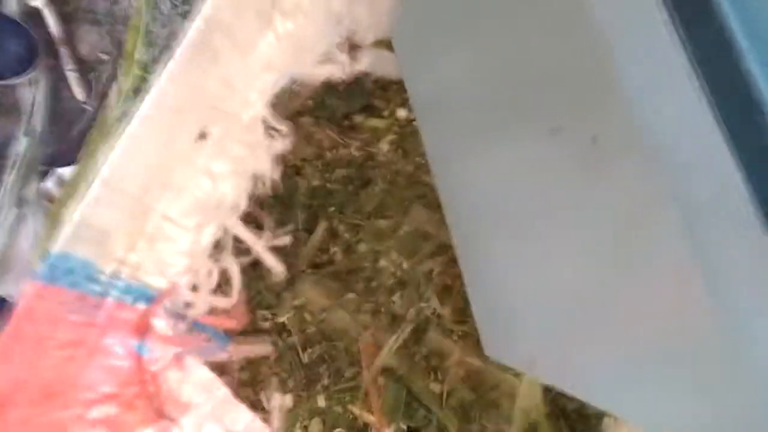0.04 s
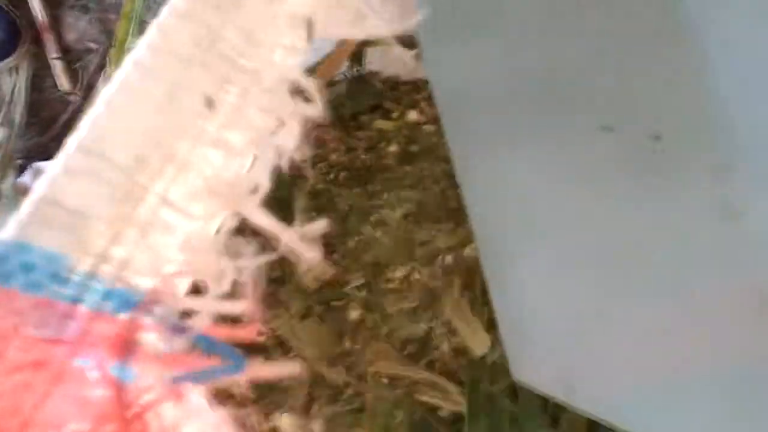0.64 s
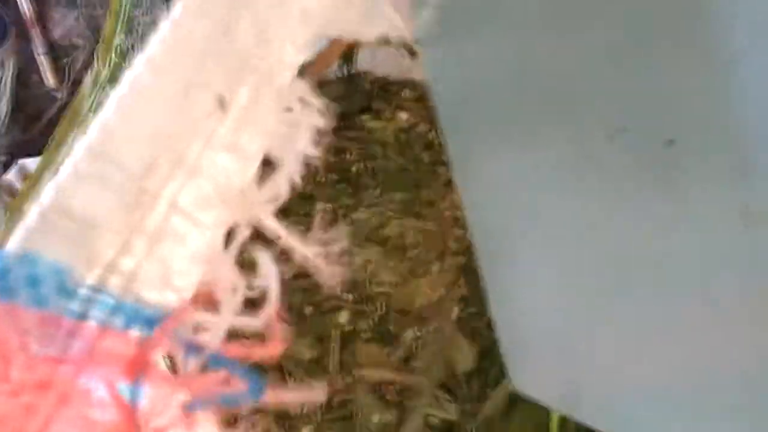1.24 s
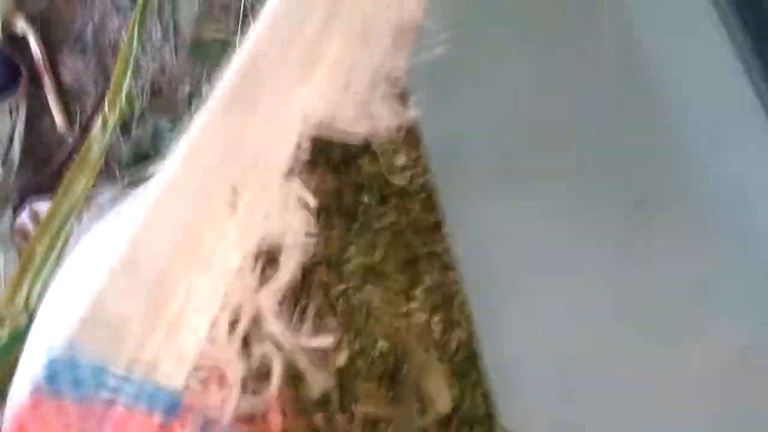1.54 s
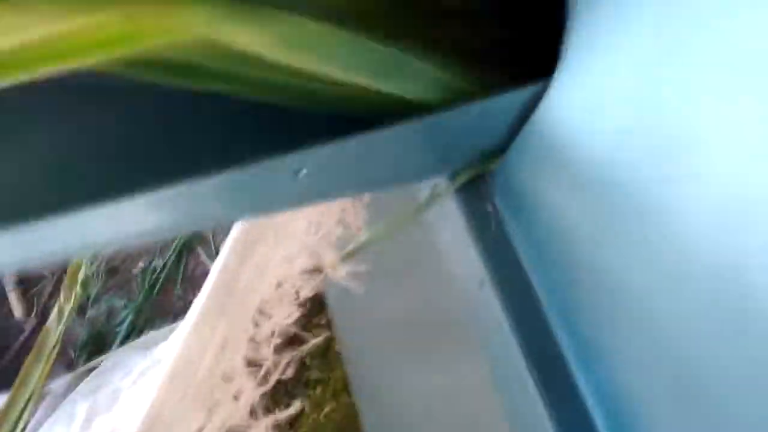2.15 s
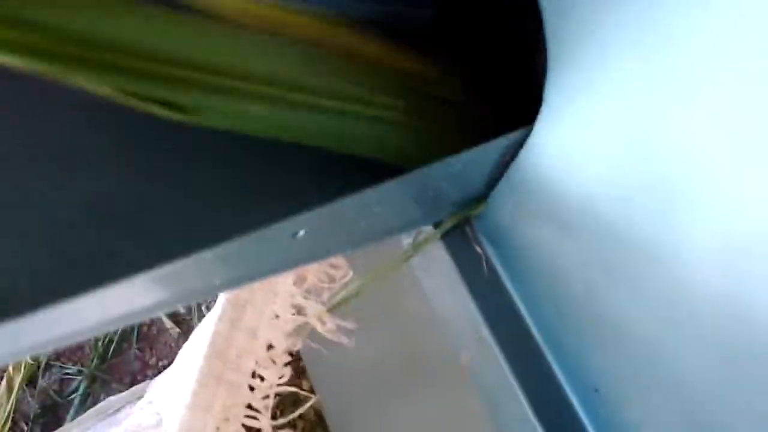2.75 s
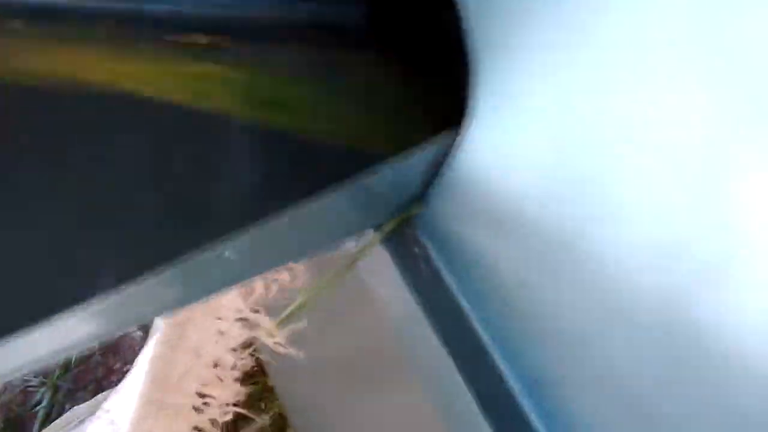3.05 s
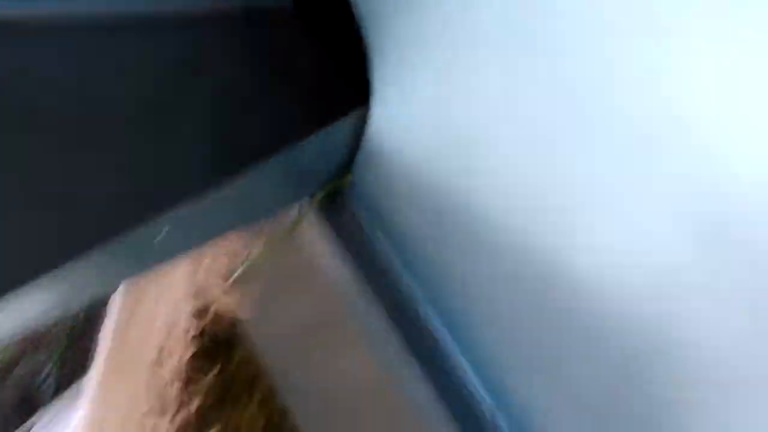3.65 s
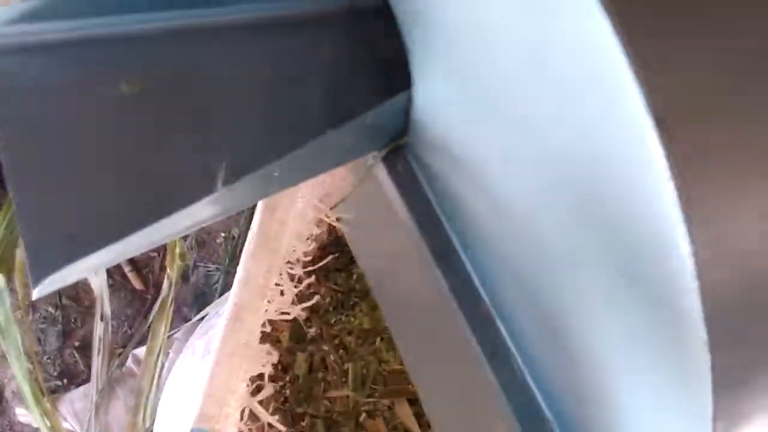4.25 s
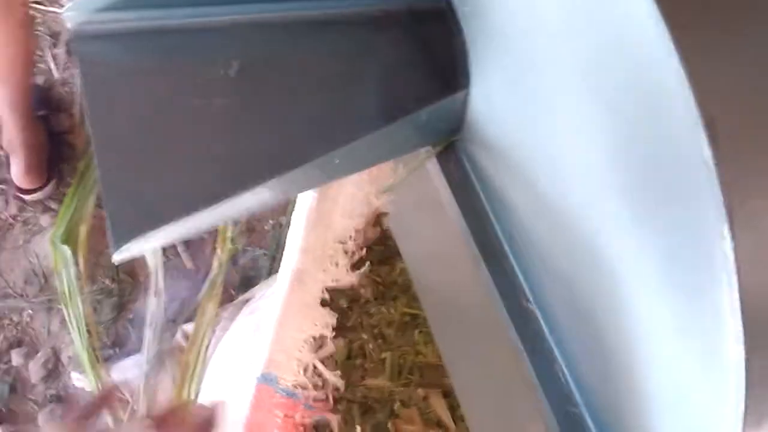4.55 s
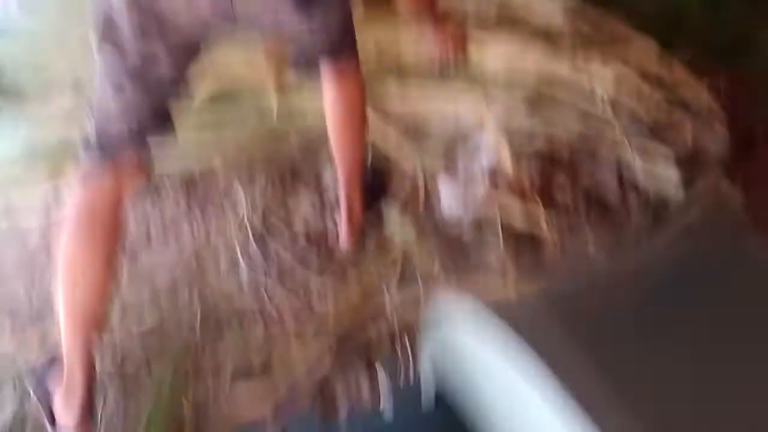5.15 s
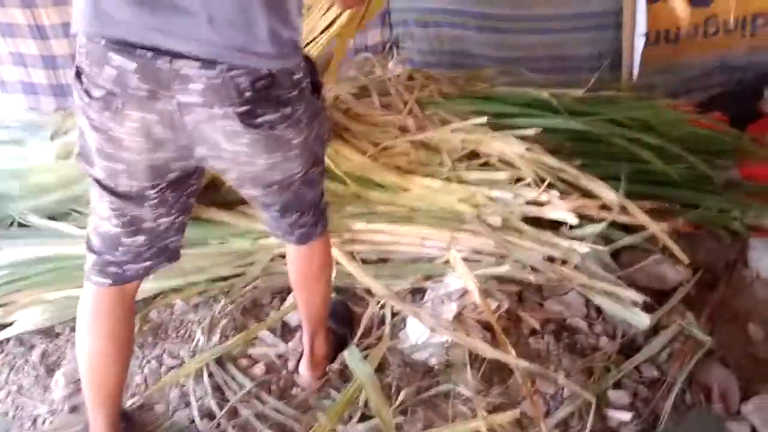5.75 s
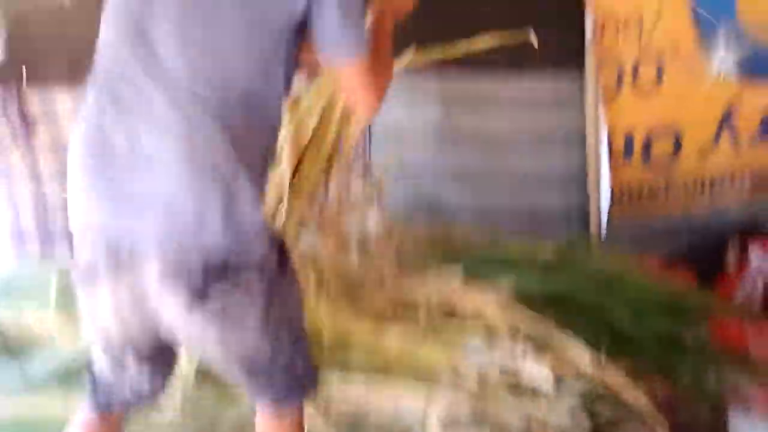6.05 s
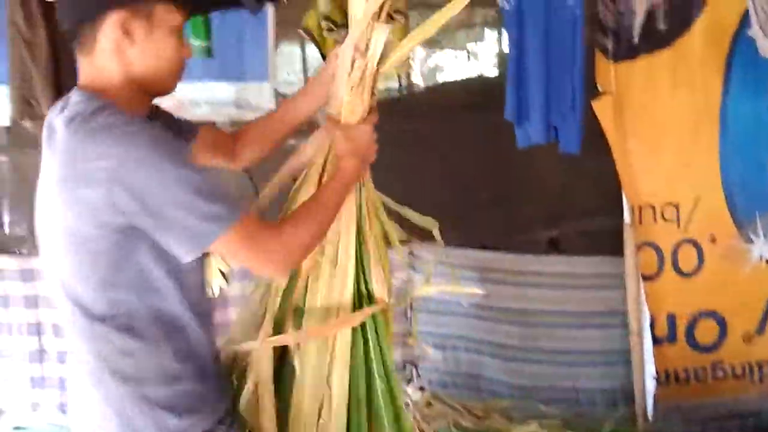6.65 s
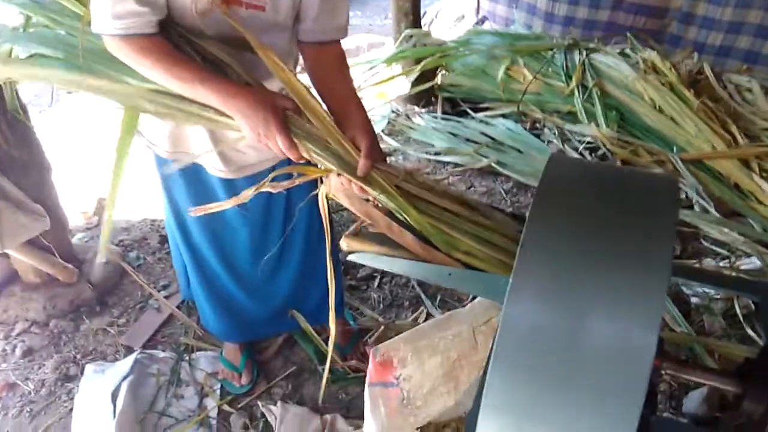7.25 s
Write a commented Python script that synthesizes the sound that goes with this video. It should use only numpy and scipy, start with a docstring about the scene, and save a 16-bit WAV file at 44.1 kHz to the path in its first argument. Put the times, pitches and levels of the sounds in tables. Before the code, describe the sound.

A small engine-driven chopper is already running, heard close to its steel hopper. Its fast blades shred stalks with a dense rasping, crackling hiss and a wavering metallic ring over the engine's throb. Thick stalks crack sharply in the first half second. The cutting eases around 1 second, then builds again, with many cracks and crunches from about 1.8 to 3.2 seconds. At about 3.3 seconds the bundle is through and the machine runs on empty, slightly faster, rushing and humming. Stray pieces knock in the drum between 3.7 and 4.8 seconds, and short scrapes, ticks and faint rustles of chaff continue afterwards. From about 5.2 seconds the engine's clatter and rattling cover come forward as the microphone moves past. At 6.7 seconds the sound cuts to silence, returning at about 7.2 seconds for a moment as a louder, harsher rush.

```python
"""Engine-driven fodder chopper

Two knives on a belt-driven rotor rasp through a bundle of stalks, heard from round the hopper.
Each cut crackles and rings the sheet-steel housing, more so the heavier the feed. After about 3.3 s
the bundle is through and the machine runs on empty, rushing and throbbing, stray pieces knocking.
The sound cuts out for half a second and returns for a moment at the feed side."""
import sys
import numpy as np
from scipy import signal
from scipy.fft import rfft, irfft, next_fast_len
from scipy.io import wavfile
from scipy.ndimage import uniform_filter1d, minimum_filter1d, map_coordinates

SR = 44100
rng = np.random.default_rng(int(sys.argv[2]) if len(sys.argv) > 2 else 0)


def bounce(signal):
    """Save signal as a 16-bit WAV file at the path given by the first command-line argument."""
    frames = np.transpose(np.atleast_2d(signal))
    limited = np.clip(frames, -1, 1)
    pcm = np.round(limited * 32767).astype(np.int16)
    wavfile.write(sys.argv[1], SR, pcm)


N = 322371
T = np.arange(N) / SR
HZ = np.fft.rfftfreq(next_fast_len(N + SR // 2), 1 / SR)
TOP_HZ = 14450


def amp(db):
    """Decibels to gain."""
    return 10 ** (np.asarray(db) / 20)


def unit(x):
    """Scale to rms 1."""
    return x / np.sqrt(np.mean(x ** 2) + 1e-20)


def curves(rows):
    """One value per sample for each column after the time."""
    times, *columns = np.transpose(rows)
    return [np.interp(T, times, column) for column in columns]


def white(n=N):
    """Fresh white noise."""
    return rng.standard_normal(n)


def wobble(per_s):
    """A smooth random curve, per_s knots a second."""
    return map_coordinates(white(int(N * per_s / SR) + 4), [T * per_s])


def filtered(x, response):
    """x times a response on the HZ grid."""
    size = 2 * (len(HZ) - 1)
    return irfft(rfft(x, size) * response, size)[:N]


def coloured(x, spectrum):
    """x shaped by (Hz, dB) points, at rms 1."""
    hz, db = np.transpose(spectrum)
    return unit(filtered(x, amp(np.interp(np.log(HZ + 1), np.log(hz), db))))


def ring(x, hz, width_hz):
    """x through one resonance with trimmed skirts, at rms 1."""
    mode = lambda w: 1j * HZ * w / (hz * hz - HZ * HZ + 1j * HZ * w)
    return unit(filtered(x, mode(width_hz) * mode(4 * width_hz)))


def glided(x, shift_hz):
    """x shifted in frequency along a curve."""
    return np.real(signal.hilbert(x) * np.exp(2j * np.pi * np.cumsum(shift_hz) / SR))


def strokes(cycles, scatter_db, uneven_db=0):
    """An impulse at each whole cycle; every second one is offset by uneven_db."""
    at = np.flatnonzero(np.diff(np.floor(cycles)) > 0)
    size_db = scatter_db * white(1024)[:len(at)] + uneven_db * (np.arange(len(at)) % 2)
    return np.bincount(at, amp(size_db), N)


def bursts(hits, rise_s, decay_s, floor):
    """Envelope of hits that swell and die away over a steady floor."""
    t = T[:SR // 3]
    shape = (1 - np.exp(-t / rise_s)) * np.exp(-t / decay_s)
    return np.hypot(unit(signal.fftconvolve(hits, shape)[:N]), floor)


def swell(start_s, rise_s, fall_s, hold_s=0):
    """Envelope that rises from start_s and begins to die away hold_s later."""
    age = np.maximum(T - start_s, 0)
    return (1 - np.exp(-age / rise_s)) * np.exp(-np.maximum(age - hold_s, 0) / fall_s)


def grains(per_s, spread_db):
    """Noise broken into tiny snaps of uneven size."""
    return unit(white() * amp(spread_db * np.clip(wobble(per_s), -2.5, 2.5)))


def rough_ping(t, hz, decay_s, jitter_rad):
    """A decaying sine whose phase takes a random step each sample."""
    phase = 2 * np.pi * hz * t + np.cumsum(jitter_rad * white(len(t)))
    return np.sin(phase) * np.exp(-t / decay_s)


def fibres(hits, count, hz, spread_db, decay_s):
    """A few fibres snap just after each hit, each at its own pitch and size."""
    at = np.repeat(np.flatnonzero(hits), count)
    lag, pitch, size = white((len(at), 3)).T
    t = T[:SR // 250]
    start = at + (np.abs(lag) * .0018 * SR).astype(int)
    pitch_hz = np.minimum(hz * np.exp(.36 * pitch), TOP_HZ)
    pings = np.sin(2 * np.pi * pitch_hz[:, None] * t) * np.exp(-t / decay_s)
    pings *= (hits[at] * amp(spread_db * np.minimum(size, 2)))[:, None]
    samples = start[:, None] + np.arange(len(t))
    return unit(np.bincount(samples.ravel(), pings.ravel(), N)[:N])


# Listening spots: above the hopper, its rim, throat, feed tray, facing the engine, past it.
# Each row: arrival and departure in seconds, then a gain in dB for each of PARTS.
PLACES = [(0, 1.28, -36.5, -30, -48, -75, -46.5, -44.5, -1),
          (1.5, 1.72, -30.5, -32.5, -43.5, -69.5, -45, -51.5, -3.5),
          (2.048, 3.953, -39, -40.5, -45, -62, -47, -50, 4.5),
          (4.207, 4.882, -38, -39.5, -35, -64.5, -54, -53, 2),
          (5.58, 6.0, -33, -30.5, -41, -56.5, -54, -50, 3),
          (6.15, 6.699, -34, -31.5, -40.5, -56, -55.5, -53.5, 3.5)]
PARTS = ["chute", "clatter", "tray", "chaff", "rotor", "crank", "tear"]


def heard_db(part):
    """A part's gain as the listener lingers at each spot and walks on to the next."""
    column = PARTS.index(part)
    path = [(s, gains[column]) for arrives, leaves, *gains in PLACES for s in (arrives, leaves)]
    return curves(path)[0]


# The bundle's load on the knives. Each row: time in seconds, load in dB.
FEED = [(0, -36.5), (.1, -34), (.22, -37.5), (.35, -36.5), (.53, -37), (.72, -41.5), (.85, -46.5),
        (.96, -51.5), (1.05, -46.5), (1.17, -44), (1.29, -41.5), (1.44, -49.5), (1.6, -44.5), (1.8, -43),
        (1.95, -39.5), (2.13, -38.5), (2.4, -36.5), (2.6, -43), (2.68, -35.5), (2.9, -42), (3.15, -40.5),
        (3.22, -47.5), (3.28, -57), (3.34, -69.5), (3.7, -59.5)]
FULL_FEED_DB = -40


def load_db():
    """Knife load relative to full feed."""
    return curves(FEED)[0] - FULL_FEED_DB


def muffle_db():
    """Stalks in the drum slightly muffle its roar and the exhaust until they are through."""
    return np.interp(T, [3.1, 3.35], [-.5, 0])


# Spectra of snapping fibres and tearing leaves. Each row: frequency in Hz, relative level in dB.
CRACKLE_SPECTRUM = [(2500, -39), (4200, -7), (5200, -2.5), (6500, -1), (8500, -1.5), (10500, -8.5),
                    (13000, -11), (15000, -9)]
TEAR_SPECTRUM = [(300, -11.5), (700, 8.5), (1400, 5), (2400, 4), (3200, 12), (3800, 2.5), (4400, 1),
                 (5200, -14.5), (8000, -33.5)]


def cutting(cuts):
    """Every knife pass snaps fibres and tears leaves; the uneven bundle makes it surge."""
    hits = strokes(cuts + .5 + .02 * wobble(70), scatter_db=1.8, uneven_db=2.7)
    # firm stalks give distinct bites; the leafy ends fill the gaps
    leafy = np.interp(T, [.6, 1, 2.9, 3.3], [.42, .66, .62, 1.5])
    bite = bursts(hits, rise_s=.0002, decay_s=.0032, floor=leafy)
    snaps = fibres(hits, count=3, hz=7500, spread_db=2.5, decay_s=.0004)
    crackle = coloured(grains(900, spread_db=2.3) * bite + .3 * snaps, CRACKLE_SPECTRUM)
    shear = bursts(hits, rise_s=.0003, decay_s=.0045, floor=.6)
    crunch = fibres(hits, count=2, hz=3700, spread_db=3, decay_s=.0012)
    tear = coloured(grains(600, spread_db=1.2) * shear + .25 * crunch, TEAR_SPECTRUM)
    crackle_db = -35.5 + load_db()
    tear_db = -32 + .66 * load_db() + heard_db("tear")
    surge = amp(1.2 * wobble(16))
    return surge * (amp(crackle_db) * crackle + amp(tear_db) * tear)


# Housing modes, the throat's last, plus a rasp of dragged leaves near 3750 Hz.
# Each row: frequency in Hz, width in Hz, blow-to-scrape weight.
BANDS = [(794, 36, 2.3), (854.4, 55.6, 1.82), (962, 70, 0.99), (1226, 28, 2.6), (1670, 92, 3.1),
         (1840, 60, 2), (2040, 130, 1.2), (2191, 150, 1.2), (2599, 66.5, 0.87), (2938, 86, 0.43),
         (3044, 81, .9), (3750, 260, 0.19), (2765, 102, 0.5)]
# Per band: relative level in dB at full feed; dB gained per dB of load.
BAND_DB = [-40.5, -35, -55.5, -40.5, -61.5, -60.5, -42, -40.5, -44, -46, -54, -45.5, -34.5]
BAND_GROWTH = [0.32, 0.46, 1.2, 0.3, 0.72, .7, 1.4, 2.8, 2.1, 2, 1.5, 2.5, 1.6]
# Swells of a housing mode or, at 3800 Hz, of the leaf rasp.
# Each row: start in seconds, hold in seconds, rough pitch in Hz, relative level in dB.
BAND_SWELLS = [(0, 0.21, 2190, -26), (0, 0.79, 965, -32), (.06, 0.061, 2769, -19.5),
               (0.238, 0.54, 1232, -24.5), (0.284, 0.21, 2769, -23), (0.354, 0.19, 2580, -26),
               (0.44, 0.18, 2056, -25.5), (0.38, 0.31, 845, -30.5), (0.585, 0.55, 1680, -31.5),
               (0.722, 0.65, 1850, -34), (1, 0.27, 3080, -42.5), (1.188, 0.45, 1680, -33.5),
               (1.065, 0.45, 845, -28), (1.253, 0.18, 1232, -34), (1.085, 0.19, 2769, -34),
               (1.22, 0.062, 2769, -31), (1.39, 0.11, 2769, -31.5), (1.5, 0.086, 2769, -37.5),
               (1.555, 0.36, 845, -26), (1.499, 0.4, 795, -31), (1.675, 0.096, 2056, -34.5),
               (1.84, 0.5, 1232, -31.5), (1.88, 0.13, 2580, -30), (1.995, 0.15, 3800, -30.5),
               (2.083, 0.025, 2190, -18.5), (2.228, 0.48, 2769, -21.5), (2.358, 0.25, 2960, -27),
               (2.657, 0.1, 2580, -32.5), (2.36, 0.11, 1680, -34), (2.619, 0.053, 3800, -40),
               (2.719, 0.082, 2769, -12), (2.779, 0.27, 2190, -25), (2.84, 0.33, 2769, -21.5),
               (2.96, 0.061, 3800, -28.5), (2.983, 0.2, 2580, -26), (3.06, 0.1, 2769, -17.5),
               (3.084, 0.094, 2960, -24), (3.2, 0.094, 2769, -35)]


def band_gains():
    """Each band grows with the load and swells while a stalk bears on a panel or leaves drag."""
    gains = amp(np.array(BAND_DB)[:, None] + np.outer(BAND_GROWTH, load_db()))
    band_hz = np.array(BANDS)[:, 0]
    for start_s, hold_s, hz, db in BAND_SWELLS:
        nearest = np.argmin(np.abs(band_hz - hz))
        boost = amp(db) * swell(start_s, rise_s=.013, fall_s=.026, hold_s=hold_s)
        gains[nearest] = np.hypot(gains[nearest], boost)
    return gains


# The throat mode sags and recovers as the bundle passes. Each row: time in seconds, pitch in Hz.
THROAT_PITCH = [(0, 2810), (.3, 2730), (.45, 2710), (.9, 2650), (1.15, 2607), (1.27, 2500), (1.45, 2500),
                (1.62, 2550), (1.9, 2693), (2.3, 2791), (2.5, 2813), (2.66, 2775), (2.78, 2823),
                (3.02, 2825), (3.12, 2795), (3.3, 2824)]


def housing_and_rasp(cuts):
    """Each cut rings the housing and rasps leaves: a repeating blow, then a scrape new each time."""
    blows = strokes(cuts + .5, scatter_db=1.3, uneven_db=3)
    scrape = bursts(blows, rise_s=.0002, decay_s=.003, floor=.45)
    *bands, throat = [gain * ring(weight * unit(blows) + scrape * white(), hz, width_hz)
                      for (hz, width_hz, weight), gain in zip(BANDS, band_gains())]
    # the throat wavers as the stalks shift, and squeals while a knife is in them
    shift_hz = curves(THROAT_PITCH)[0] - BANDS[-1][0] + 21 * wobble(50)
    passes = strokes(cuts + .5, scatter_db=2)
    contact = unit(bursts(passes, rise_s=.0002, decay_s=.0065, floor=.75))
    return amp(1) * sum(bands) + contact * glided(throat, shift_hz)


# The knives gradually speed up and run fastest once empty. Each row: time in seconds, cuts per second.
CUT_RATE = [(0, 68.03), (0.4, 70.07), (0.6, 69.95), (1.1, 71.25), (1.4, 72.25), (1.8, 72.65), (2.15, 74.18),
            (2.4, 74.31), (2.85, 73.08), (3.2, 74.4), (3.8, 76.0), (4.5, 77.5), (5.5, 78.0), (6.7, 77.8)]
# Tones at 2, 3 and 4 times the turning rate, relative levels in dB.
ROTOR_ORDERS_DB = [-1, -4, -2.5]
# Fanned air. Each row: frequency in Hz, relative level in dB.
DRAUGHT_SPECTRUM = [(15, -10), (35, -17.5), (70, 5.5), (130, 4), (300, -19), (800, -66)]
HUM_HZ, HUM_WIDTH_HZ, HUM_DB = 183.1, 4.1, -35


def rotor(cuts):
    """The two-knife rotor fans the air; its fifth order hums in the housing's lowest resonance."""
    angle = np.pi * cuts
    tones = sum(amp(db + 1.2 * wobble(3.7)) * np.sin(order * angle + rng.uniform(0, 2 * np.pi))
                for order, db in enumerate(ROTOR_ORDERS_DB, 2))
    turning_hz = curves(CUT_RATE)[0] / 2
    detune = (5 * turning_hz - HUM_HZ) / (HUM_WIDTH_HZ / 2)
    hum = amp(HUM_DB + 1.2 * wobble(6)) / np.hypot(1, detune) * np.sin(5 * angle)
    draught = coloured(white(), DRAUGHT_SPECTRUM)
    return amp(heard_db("rotor")) * (np.sqrt(2) * tones + draught) + np.sqrt(2) * hum


# Exhaust pulses. Each row: frequency in Hz, relative level in dB.
EXHAUST_SPECTRUM = [(25, -44), (60, -17), (98, -12.5), (130, -11), (165, -7), (200, 3), (260, 5),
                    (330, -10), (440, -12.5), (600, -30), (1200, -38.5), (3000, -69)]


def engine(firings):
    """One cylinder fires every second crank turn; the shed's walls smear each exhaust pulse."""
    crank = np.sqrt(2) * amp(heard_db("crank") + wobble(4.1)) * np.sin(4 * np.pi * firings)
    pulses = strokes(firings, scatter_db=1.5)
    t = T[:SR // 8]
    walls = white(len(t)) * np.exp(-t / .019)
    exhaust = coloured(signal.fftconvolve(pulses, walls)[:N], EXHAUST_SPECTRUM)
    return crank + amp(-38.5 + muffle_db()) * exhaust


def steel_walls(x, decay_s, positions):
    """Steel walls comb the sound finely; the comb changes as the listener moves."""
    t = T[:SR // 12]
    position = T / T[-1] * (positions - 1)
    out = np.zeros(N)
    for k in range(positions):
        echoes = white(len(t)) * np.exp(-t / decay_s)
        comb = .85 + .53 * rfft(echoes / np.linalg.norm(echoes), 2 * len(t))
        comb /= np.sqrt(uniform_filter1d(np.abs(comb) ** 2, size=50))  # flattens the broad colour, keeping only the fine comb
        nearness = np.clip(1 - np.abs(position - k), 0, 1)
        out += nearness * signal.oaconvolve(x, irfft(comb)[:len(t)])[:N]
    return 1.135 * out


# Flung clumps of chaff. Each row: start in seconds, hopper boom gain in dB, chute whoosh gain in dB.
CLUMPS = [(0.552, -23.5, -41.5), (.76, -31, -54.5), (.98, -27.5, -57), (1.52, -32.5, -41), (3.27, -28, -40),
          (3.632, -26, -37.5), (3.74, -48, -29.5), (4.14, -36.5, -48), (4.35, -27.5, -73), (4.6, -51, -56),
          (4.78, -31, -41), (5.05, -43, -36.5), (5.98, -27.5, -53), (6.54, -41.5, -49)]
# Spectra of the running noise. Each row: frequency in Hz, relative level in dB.
DRUM_SPECTRUM = [(20, -35.5), (45, -43.5), (70, -19.5), (110, -14.5), (150, -18.5), (178, -3.5), (200, 2),
                 (232, 4.5), (290, -5), (350, -17), (420, -33.5), (560, -28), (800, -57)]
CHUTE_SPECTRUM = [(350, -29), (540, -3), (650, -0.5), (750, 7.5), (840, 7.5), (1000, 2.5), (1150, -12),
                  (1500, -76)]
CLATTER_SPECTRUM = [(700, -16), (1000, 5), (1300, 8), (1530, 5), (1750, 1.5), (2000, 0.5), (2500, -8),
                    (3500, -48)]
AIR_SPECTRUM = [(1200, -11), (1900, -3.5), (2350, 8), (2850, 7), (3050, 1.5), (3300, -6.5), (3700, -10.5),
                (4300, -17.5), (5200, -56), (8000, -59)]
CHAFF_SPECTRUM = [(2500, -7), (4300, 10.5), (5300, 0), (7000, -3), (9000, -10.5), (11000, -22.5),
                  (14500, -24.5)]


def running_noise(cuts, firings):
    """Air roars through drum and chute, the engine clatters and chaff ticks on the steel."""
    boom, whoosh = sum(amp(gains_db)[:, None] * swell(start_s, rise_s=.018, fall_s=.06)
                       for start_s, *gains_db in CLUMPS)
    pulses = strokes(firings, scatter_db=10, uneven_db=-2.5)
    throb = bursts(pulses, rise_s=.0016, decay_s=.005, floor=14)
    passes = strokes(cuts, scatter_db=1.5, uneven_db=2)
    swish = bursts(passes, rise_s=.001, decay_s=.005, floor=2.2)
    drum = amp(-35 + muffle_db()) * coloured(white() * throb, DRUM_SPECTRUM)
    hopper = (amp(-39.5 + 1.4 * wobble(7.7)) + boom) * ring(white(), hz=452.7, width_hz=49)
    tray = amp(heard_db("tray")) * ring(white(), hz=317.3, width_hz=55)
    chute_gain = amp(heard_db("chute") + 2.5 * wobble(15)) + whoosh
    chute = chute_gain * coloured(white() * swish, CHUTE_SPECTRUM)
    clatter_gain = amp(heard_db("clatter") + 1.7 * wobble(11))
    clatter = clatter_gain * coloured(grains(250, spread_db=1.5) * throb, CLATTER_SPECTRUM)
    air = amp(-41 + 1.3 * wobble(17)) * coloured(grains(250, spread_db=1.5) * swish, AIR_SPECTRUM)
    chaff_gain = amp(heard_db("chaff") + 1.005 * wobble(37))
    chaff = chaff_gain * coloured(grains(300, spread_db=1.5) * throb, CHAFF_SPECTRUM)
    hollow = steel_walls(chute + clatter + air, decay_s=.0069, positions=36)
    return drum + hopper + tray + chaff + hollow


# The engine cover's ring as the listener passes.
# Each row: time in seconds, pitch in Hz, dB added to the clatter gain.
COVER_RING = [(5.2, 1560, -8), (5.45, 1570, -2.5), (5.82, 1580, -2), (6.1, 1510, -2), (6.7, 1530, -3)]


def cover_rattle(firings):
    """Each firing shakes the engine's cover, which rings briefly."""
    hz, db = curves(COVER_RING)
    jolts = strokes(firings + .12 * wobble(30), scatter_db=3)
    shaking = bursts(jolts, rise_s=.0004, decay_s=.005, floor=.55) * white()
    cover = ring(shaking, hz.mean(), width_hz=100)
    return amp(heard_db("clatter") + db) * glided(cover, hz - hz.mean())


# Flurries of chaff. Each row: time in seconds, level in dB.
FLURRIES = [(3.3, -54.5), (3.6, -73), (3.95, -90.5), (4.2, -65), (4.4, -73), (4.52, -65), (4.72, -74.5),
            (5.0, -68.5), (5.3, -72.5), (5.55, -65.5), (5.7, -78), (6.3, -63), (6.7, -64.5)]
# Their rustle. Each row: frequency in Hz, relative level in dB.
RUSTLE_SPECTRUM = [(3500, -23), (5500, 2.5), (8200, -2.5), (10000, -1.5), (12000, -9.5), (14500, -13)]
# Hard bits on the chute. Each row: start in seconds, peak in dB, pitch in Hz.
TICKS = [(3.399, -36, 7630), (3.507, -39, 7610), (4.1, -50, 6310), (4.14, -49, 7270), (5.418, -47, 8300),
         (5.935, -47, 7500), (6.113, -44, 8430), (6.222, -47, 5820)]
BITS_PER_S = 14


def loose_chaff():
    """Loose chaff rustles out of the chute in flurries; single bits tick on the steel."""
    bits = (rng.random(N) < BITS_PER_S / SR) * amp(2 * np.clip(white(), -2, 2))
    patter = fibres(bits, count=3, hz=7500, spread_db=2, decay_s=.0009)
    rustle = coloured(grains(250, spread_db=1.6) + .25 * patter, RUSTLE_SPECTRUM)
    out = amp(curves(FLURRIES)[0] + .9 * wobble(29)) * rustle
    t = T[:SR // 50]
    for start_s, db, hz in TICKS:
        out[round(start_s * SR):][:len(t)] += amp(db) * rough_ping(t, hz, decay_s=.003, jitter_rad=.35)
    return out


# Thick stalks. Each row: start in seconds, crack and crunch in dB before filtering, pitch in Hz.
SPLITS = [(0.2535, -22.5, -25, 3300), (0.312, -17.5, -28.5, 3320), (0.3407, -8, -24, 3400),
          (0.4265, -17.5, -27, 3200), (0.456, -12, -24.5, 3180), (0.483, -14.5, -27.5, 3320),
          (0.5128, -8.5, -21.5, 3420), (0.5405, -11.5, -25.5, 3300), (1.2768, -28, -18.5, 4960),
          (1.83, -14.5, -28, 3470), (1.938, -31, -16, 3600), (1.9922, -20.5, -22, 3600),
          (2.0477, -13, -11.5, 3550), (2.0735, -9.5, -12, 3660), (2.129, -6, -9.5, 3530),
          (2.237, -20.5, -11, 3350), (2.264, -14.5, -16, 3540), (2.2774, -15, -8, 3600),
          (2.304, -19, -11.5, 3360), (2.3442, -12.5, -3, 3400), (2.481, -26, -10.5, 3660),
          (2.6274, -27, -13, 3560), (2.667, -10.5, -16.5, 3286), (2.833, -9.5, -13, 3480),
          (2.888, -6, -14.5, 3520), (2.9158, -10, -8, 3190), (2.97, -18, -11.5, 3780),
          (3.052, -27.5, -10.5, 3610), (3.159, -5, -11.5, 3270), (3.2, -27.5, -15.5, 3750),
          (3.279, -36, -31, 3500), (3.293, -37, -30, 3400), (3.345, -45.5, -37.5, 4050),
          (3.359, -43, -42, 4130), (3.373, -37.5, -35.5, 4250), (3.388, -37.5, -32.5, 4080)]


def stalk_splits():
    """A thick stalk gives way under a knife with a sharp crack and a short pitched crunch."""
    out, t = np.zeros(N), T[:SR // 25]
    for start_s, crack_db, crunch_db, hz in SPLITS:
        crack = white(len(t)) * np.exp(-t / .0008)
        crunch = rough_ping(t, hz, decay_s=.004, jitter_rad=.17) * (1 - np.exp(-t / .0005))
        out[round(start_s * SR):][:len(t)] += amp(crack_db) * crack + amp(crunch_db) * crunch
    return filtered(out, np.interp(HZ, [1500, 3300, 8500, 14000], [.31, .65, .74, .24]))


# Pieces in the empty drum.
# Each row: start in seconds, scrape gain in dB, spray gain in dB, ping in dB over the scrape gain.
STRAYS = [(3.412, -62, -45.5, -10.5), (3.476, -36, -70, -3.5), (3.499, -50.5, -45.5, -8),
          (3.655, -37, -69.5, -21.5), (3.733, -34.5, -56, -6.5), (3.925, -41, -82.5, 5),
          (4.098, -50, -57, -7.5), (4.14, -47, -57.5, -12.5), (4.29, -39.5, -68.5, -7.5),
          (4.815, -44.5, -57, 2), (4.99, -39, -59, 0), (5.226, -35.5, -69.5, -15), (5.415, -42, -55, -17),
          (5.77, -31.5, -66, -15), (5.925, -40, -57.5, -2), (6.11, -45, -57.5, -16),
          (6.53, -40.5, -68, -14)]
# Spectra of their scrape and spray. Each row: frequency in Hz, relative level in dB.
SCRAPE_SPECTRUM = [(900, -8.5), (1700, 9), (2400, 22.5), (2850, 9.5), (3200, 5), (4500, -4), (6000, -39),
                   (12000, -55)]
SPRAY_SPECTRUM = [(2500, -34.5), (4500, -9), (6500, -2.5), (8500, 3.5), (10500, -7), (14000, -4.5)]


def stray_pieces():
    """A piece caught by the rotor scrapes the drum, pings the throat and leaves as a spray of chaff."""
    scrape_gain, spray_gain, ping_gain = np.zeros((3, N))
    for start_s, scrape_db, spray_db, ping_db in STRAYS:
        contact = swell(start_s, rise_s=.0017, fall_s=.063)
        scrape_gain += amp(scrape_db) * contact
        ping_gain += amp(scrape_db + ping_db) * contact
        spray_gain += amp(spray_db) * swell(start_s, rise_s=.008, fall_s=.035)
    scrape = amp(1.5) * coloured(grains(500, spread_db=1.2), SCRAPE_SPECTRUM)
    ping = ring(white(), hz=2775, width_hz=160)
    spray = coloured(grains(700, spread_db=1.5), SPRAY_SPECTRUM)
    return scrape_gain * scrape + ping_gain * ping + spray_gain * spray


# Hard joints of stalk. Each row: start in seconds, gain in dB, pitch in Hz, decay in seconds.
KNOCKS = [(3.71, -22, 520, 0.031), (3.736, -21.5, 2000, .004), (3.742, -25, 827, .014),
          (3.82, -20, 1190, .004), (3.929, -22, 2400, .006), (3.931, -23.5, 2800, 0.014),
          (4.011, -26, 2400, 0.0037), (4.135, -33, 1510, .008), (4.305, -32, 2830, .01),
          (4.372, -28, 2250, .004), (4.365, -22.5, 480, 0.018), (4.555, -24, 496, 0.016),
          (4.634, -22.5, 1020, 0.021), (4.765, -26.5, 860, .028), (4.727, -27, 2400, .006),
          (4.835, -33, 2830, 0.014)]
KNOCK_LOWPASS_HZ = 3900


def drum_knocks():
    """A hard joint hits the drum wall, which rings briefly and roughly at that spot's pitch."""
    out, t = np.zeros(N), T[:SR // 8]
    for start_s, db, hz, decay_s in KNOCKS:
        knock = rough_ping(t, hz, decay_s, jitter_rad=.07) * (1 - np.exp(-t / .0004))
        out[round(start_s * SR):][:len(t)] += amp(db) * knock
    return filtered(out, 1 / (1 + (HZ / KNOCK_LOWPASS_HZ) ** 8))


# The machine from the feed side. Each row: frequency in Hz, relative level in dB.
FEED_SIDE_SPECTRUM = [(30, -25), (65, -8), (140, -7.5), (220, -7.5), (400, -7.5), (750, 0), (1050, -4.5),
                      (1250, 5), (1550, -0.5), (2600, -2), (3500, -14), (5500, -25), (9000, -36),
                      (14000, -41)]


def feed_side():
    """At the feed side the machine is a louder, harsher rush."""
    return amp(-20.5) * coloured(grains(300, spread_db=2), FEED_SIDE_SPECTRUM)


def scene():
    """The chopper from round the hopper, a silent pause, then the feed side."""
    pause_start_s, pause_end_s = 6.744, 7.2435
    cuts = np.cumsum(curves(CUT_RATE)[0] * (1 + .002 * wobble(8))) / SR
    firings = .422 * cuts  # the belt ties engine to rotor
    loaded = np.interp(T, [3.35, 3.7], [1, 0])
    chopping = loaded * (cutting(cuts) + housing_and_rasp(cuts))
    stalks = chopping + stalk_splits() + stray_pieces() + drum_knocks()
    machine = rotor(cuts) + engine(firings) + running_noise(cuts, firings) + cover_rattle(firings)
    at_hopper = stalks + machine + loose_chaff()
    before, after = uniform_filter1d(np.array([T < pause_start_s, T > pause_end_s], float), size=50)
    return (at_hopper * before + feed_side() * after)[None]


def record(dry):
    """A fast limiter holds the peaks down; nothing passes above TOP_HZ."""
    ceiling = .185
    needed = np.minimum(1, ceiling / (np.abs(dry) + 1e-9))
    gain = uniform_filter1d(minimum_filter1d(needed, size=45), size=31)
    return filtered((dry * gain)[0], HZ < TOP_HZ)[None]


dry = scene()
out = record(dry)
bounce(out)
```